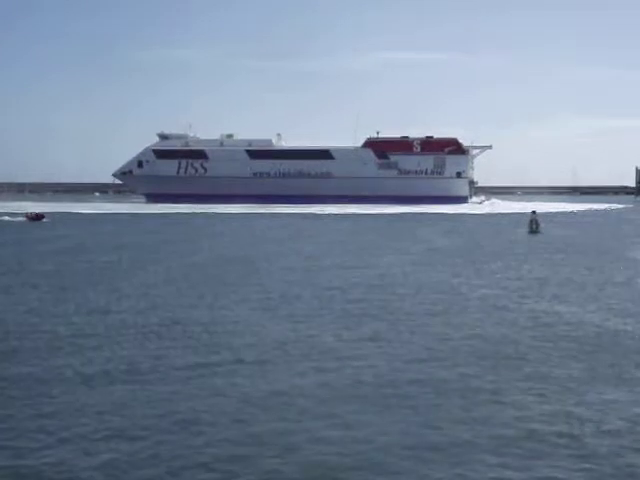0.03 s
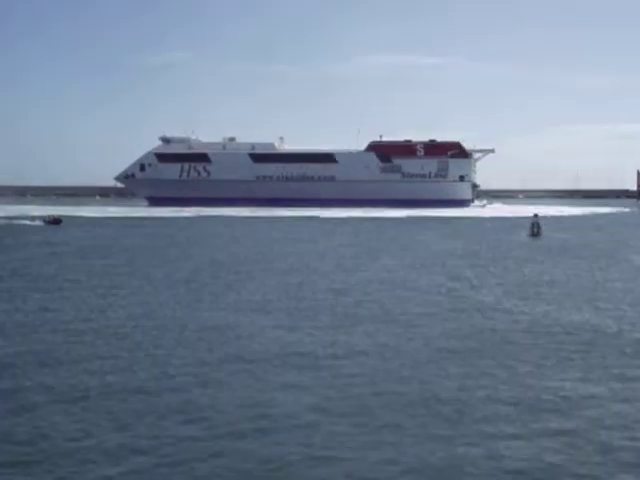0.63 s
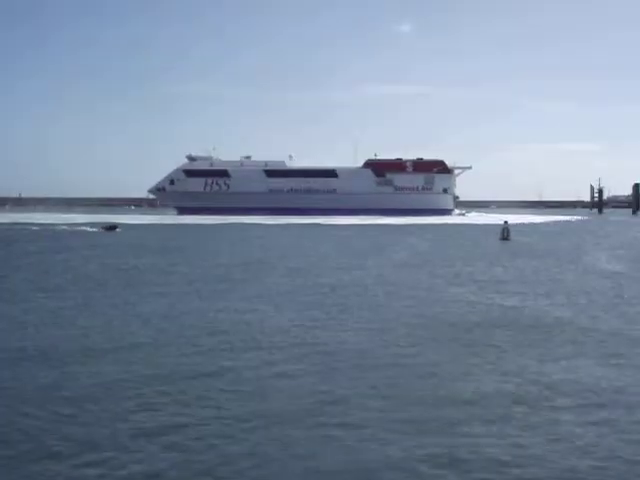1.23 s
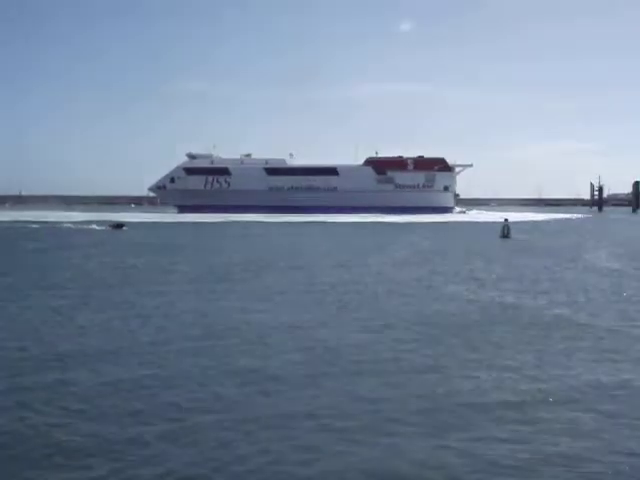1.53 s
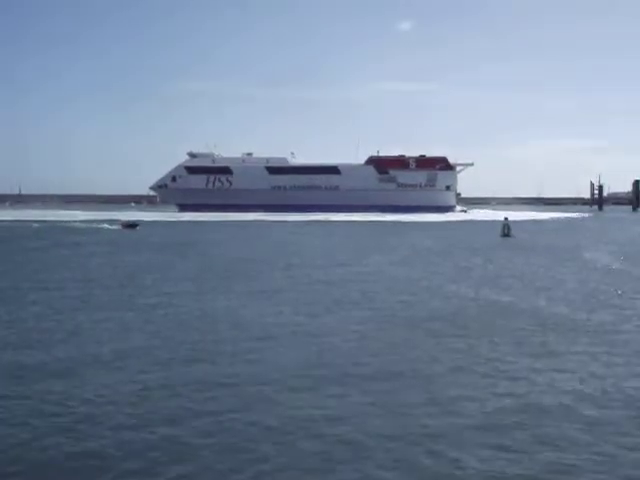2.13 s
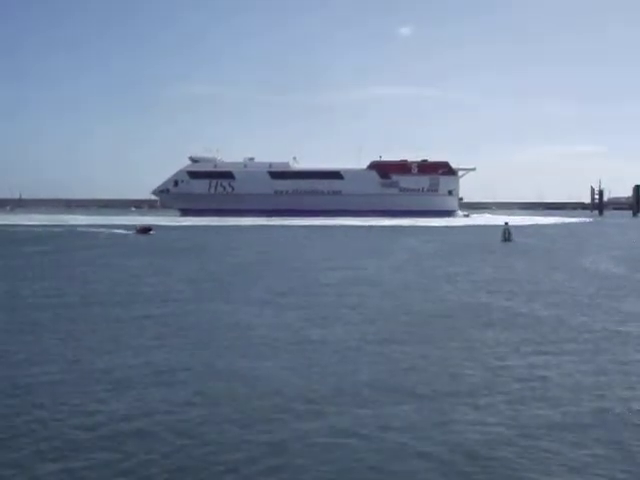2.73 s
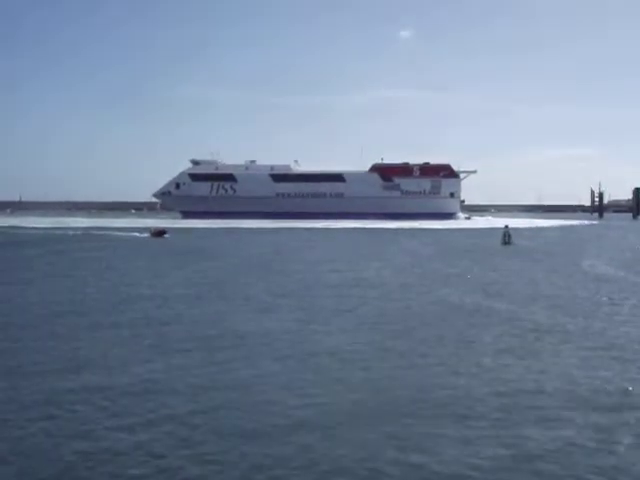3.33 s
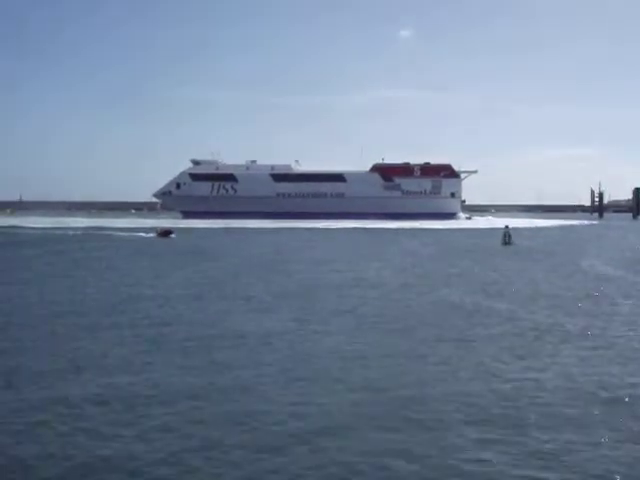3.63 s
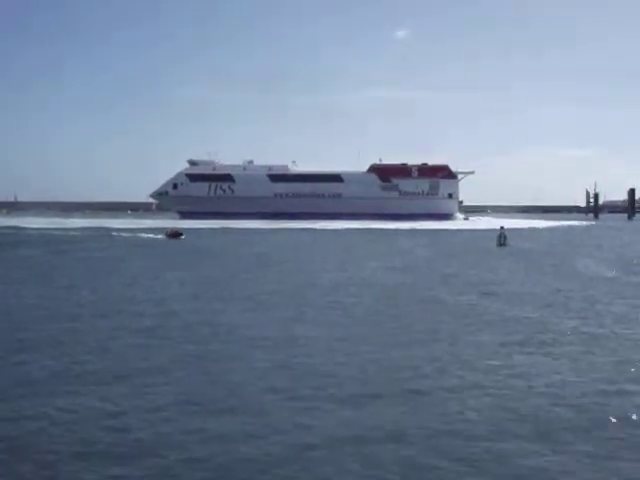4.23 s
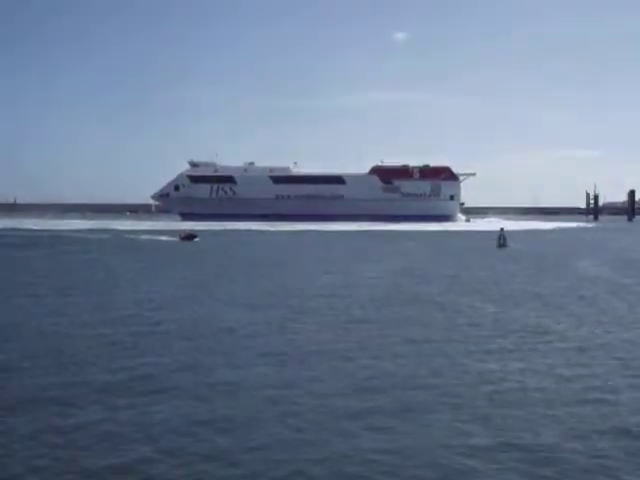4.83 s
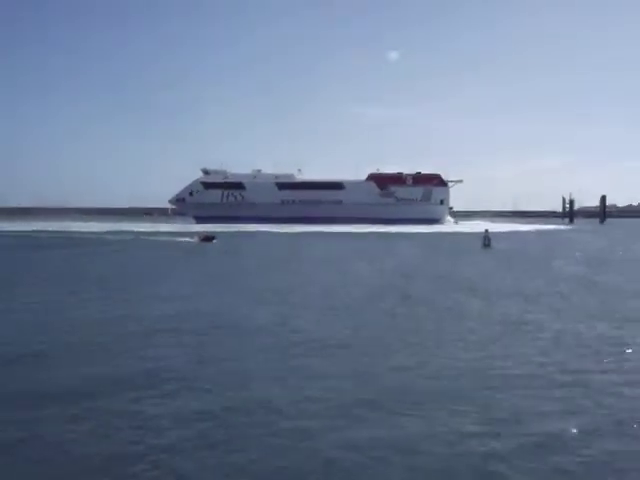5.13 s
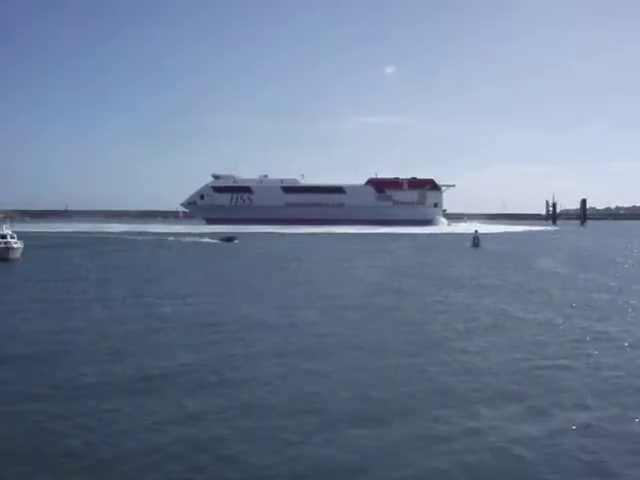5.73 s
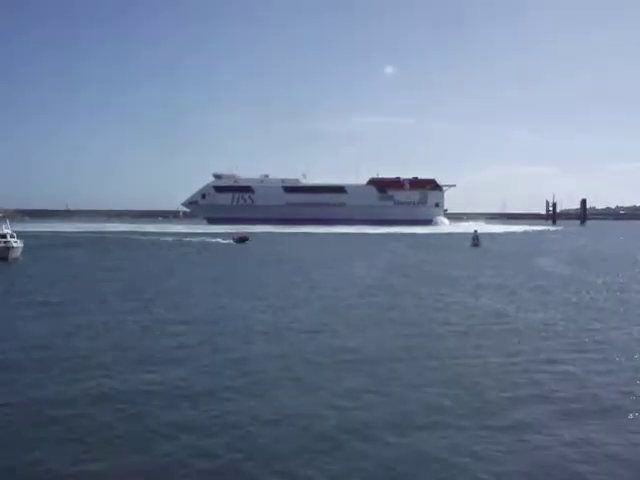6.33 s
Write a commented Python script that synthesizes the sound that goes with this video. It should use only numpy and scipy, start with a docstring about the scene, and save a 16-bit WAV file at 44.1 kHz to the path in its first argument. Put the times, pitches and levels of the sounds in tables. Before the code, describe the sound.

Wind gusts rumble on the microphone over a far ferry's low engines and churning water, with close clicks and brief lens motor whirs.

```python
"""A harbour, heard through a small camera's hissing microphone: far off, a big ferry's engines drone and
its wake washes. In the first second gusts buffet the microphone; right beside it the zoom lever clicks
and the lens motor whirs. Near 2 s a low hum swells and a faint machinery whine comes up, climbs, fades.
Around 5 s come more clicks and a second zoom, then breeze and ferry rise a little.
Throughout, the camera ducks briefly under loud peaks and clips them."""
import sys
import numpy as np
from scipy import signal
from scipy.fft import rfft, irfft
from scipy.io import wavfile
from scipy.ndimage import uniform_filter1d

SR = 44100
rng = np.random.default_rng(int(sys.argv[2]) if len(sys.argv) > 2 else 0)


def wrap_up_sound(samples):
    """Save the sound to the file named by the first command line argument, as 16-bit audio."""
    columns = np.atleast_2d(samples).T
    # keep every value between -1 and 1, then stretch to whole-number steps
    tamed = np.clip(columns, -1, 1)
    steps = np.round(tamed * 32767).astype(np.int16)
    wavfile.write(sys.argv[1], SR, steps)


N = 285327
T, HZ = np.arange(N) / SR, np.fft.rfftfreq(N, 1 / SR)

# Levels are relative within each table. Spectra of the camera's own noises: f/Hz, level/dB
HISS_SPECTRUM = [(500, -17.5), (2000, -9), (2450, -10.5), (2750, -1), (2980, 1.5), (3150, -4.5),
                 (3400, -14), (3700, -17), (4000, -22.5), (4500, -23.5), (5200, -28.5), (6000, -34.5)]
GEAR_SPECTRUM = [(1500, -25), (2380, -14.5), (2560, -8.5), (2720, 0.5), (2900, -2), (3080, -7),
                 (3350, -27.5), (3800, -25.5), (4200, -42.5), (5000, -38), (6000, -51)]
SCRAPE_SPECTRUM = [(600, -49), (1250, 3), (1800, 6), (2300, -3), (2850, 12.5), (3300, -22), (4200, -34.5),
                   (6000, -39)]
# stretches of lens motor whir: the first zoom, briefly dropping out near 0.95 s, then the second
# t/s, length/s, level/dB
WHIR_STRETCHES = [(0.718, 0.24, -21.5), (1.004, .07, -21.5), (4.886, .355, -21)]
# lever slides, next to the microphone: t/s, length/s, level/dB
LEVER_SLIDES = [(0.135, 0.028, -28), (0.706, 0.036, -19.5), (1.139, 0.044, -16.5), (4.863, 0.078, -18.5),
                (5.317, 0.036, -19)]
# lens actuator: t/s, length/s, level/dB, upper tone against lower/dB, roughness/rad
ACTUATOR_BUZZES = [(2.07, 0.03, -27, -16.5, 0.17), (5.904, 0.0078, -23, -8.5, 0.76)]
# zoom lever: t/s, level/dB, factor on the shell's pitch, brightness/(dB per octave)
LEVER_CLICKS = [(0.135, -9, 1.006, -4), (0.2396, -2, 0.97, 4), (0.4951, 7.5, 1.02, 8),
                (0.7233, -5.5, 1.1, 7), (1.0116, -13, 0.85, 7), (1.1526, -12, 1.03, 0),
                (1.1582, -6.5, 0.98, -3), (1.528, -13.5, 0.97, -16), (2.1615, -9, 1.02, 9),
                (3.9435, -12.5, 0.88, -4), (4.6323, 0, 0.95, -7), (4.6395, -8, .87, -1),
                (4.6873, -2, 1.01, -9), (4.6964, 0, 0.947, 2), (4.893, -7, 1, 4), (4.9069, -2, 0.98, 7),
                (5.292, 8, 1.13, -3), (5.294, 12, 0.74, -1), (5.3236, -7, 0.86, 14)]
# modes of the camera's shell: f/Hz, level/dB, t60/s
SHELL_MODES = [(1260, -22, 0.015), (1853, -8, 0.025), (2480, 2.5, 0.0082), (2807, -5, 0.014),
               (3970, -14.5, 0.0075)]

# spectra of wind on the microphone: f/Hz, level/dB
RUMBLE_SPECTRUM = [(4, -4.5), (12, -1.5), (28, 4.5), (50, -6.5), (70, -4.5), (100, -18.5), (160, -39),
                   (400, -64.5)]
FLUTTER_SPECTRUM = [(30, -30.5), (70, 1), (100, 1), (150, -4.5), (220, -11.5), (330, -21.5), (500, -28),
                    (1000, -45), (3000, -71)]
BUFFET_SPECTRUM = [(50, -17.5), (110, -1), (220, -3), (340, -15.5), (520, -26), (1000, -44), (3000, -60)]
# breeze between the gusts: t/s, level/dB
BREEZE_LEVELS = [(1.3, -22.5), (3, -33.5), (4.3, -27.5), (5.4, -27.5), (6.47, -19.5)]
# gusts and the sharp buffets inside them: t/s, length/s, level/dB
WIND_GUSTS = [(-.05, 0.34, -8), (0.457, 0.58, -9.5), (1.437, 0.48, -20.5), (2.423, 0.21, -22),
              (3.263, 0.31, -24), (3.727, 0.15, -21.5), (3.923, 0.32, -27.5), (6.03, 0.11, -17.5),
              (6.306, 0.089, -17.5)]
WIND_BUFFETS = [(0.015, 0.055, -13.5), (0.269, 0.019, -21), (0.55, 0.024, -13.5), (0.805, 0.06, -13.5),
                (0.932, .06, -16.5), (3.391, 0.019, -25)]
# single eddies that thump the microphone: t/s, level/dB, f/Hz
EDDY_THUMPS = [(0.132, -5.5, 86), (0.57, -7.5, 32), (0.675, -5, 86), (1.629, -4, 42), (3.303, -16, 45),
               (3.411, -15, 105), (4.091, -16, 35)]

# spectra of the ferry from across the water: f/Hz, level/dB
WAKE_SPECTRUM = [(300, -31.5), (700, -19), (1150, -5.5), (1350, -2.5), (1520, 3.5), (1680, 0.5),
                 (1830, 1.5), (2050, 2), (2400, -3.5), (3000, -2), (3600, -25.5), (4500, -37)]
HUM_SPECTRUM = [(130, -30.5), (160, -1), (178, 5.5), (198, 4.5), (225, -8), (260, -40)]
ROAR_SPECTRUM = [(25, -3), (80, 10), (140, -5.5), (230, -1.5), (300, -4), (430, -6.5), (650, -5),
                 (850, -3.5), (1150, -7), (1600, -12), (3000, -49.5)]
# the ferry as it crosses: t/s, roar level/dB, wake level/dB
FERRY_LEVELS = [(0, -30, -35), (1.4, -34, -36.5), (2.8, -31.5, -37), (4.1, -30, -33.5), (5.4, -30, -33.3),
                (6.47, -28, -30.5)]
# swells of the low hum: t/s, length/s, level/dB
HUM_SWELLS = [(1.794, 0.67, -39), (5.45, 0.17, -46)]
# steady engine tones: f/Hz, level/dB
ENGINE_TONES = [(46.5, -27.5), (175.5, -45), (258.5, -43.5), (856, -51)]
# exhaust and hull resonances: f/Hz, width/Hz, level over the roar/dB
HULL_RESONANCES = [(175, 21, 8), (186.4, 3.6, 11.5), (223.6, 21, 6.5), (253, 1.5, 8.5), (329, 29, 6.5),
                   (402, 10, 7), (477, 20, 1), (510.6, 60, 6), (640, 21, 5), (694, 31, 2), (787, 30, 3),
                   (848, 9.6, 3)]


def gain_of(db):
    return 10 ** (np.asarray(db) / 20)


def unit_power(x):
    return x / np.sqrt(np.mean(x ** 2) + 1e-20)


def shape(spectrum):
    """A spectrum table as a gain at every frequency."""
    hz, db = np.transpose(spectrum)
    return gain_of(np.interp(np.log(HZ + 1), np.log(hz), db))


def curve(rows, column=1):
    """One column of a timed table at every sample."""
    rows = np.array(rows)
    return np.interp(T, rows[:, 0], rows[:, column])


def noise(gain):
    """Noise of unit power with the given spectrum."""
    return unit_power(irfft(rfft(rng.standard_normal(N)) * gain, N))


def drift(hz):
    """Random wander up to about this rate."""
    return noise(1 / (1 + (HZ / hz) ** 4))


def steady_noise(spectrum, window_s=0.09):
    """Noise whose strength holds from one short stretch to the next."""
    x = noise(shape(spectrum))
    return x / np.sqrt(uniform_filter1d(x ** 2, int(window_s * SR)) + 0.1)


def envelope(start, length, rise_s, fall_s):
    """Attack, hold and an exponential release."""
    return np.clip((T - start) / rise_s, 0, 1) * np.exp(-np.maximum(T - start - length, 0) / fall_s)


def swells(rows, rise_s, fall_s):
    """One envelope a row, each at its level, summed."""
    return sum(gain_of(db) * envelope(start, length, rise_s, fall_s) for start, length, db in rows)


def lowpass(x, hz):
    return signal.oaconvolve(x, signal.firwin(161, hz, window=("kaiser", 9), fs=SR), "same")


def camera_hiss(level_db=-34.5):
    """The camera's self-noise lies under everything."""
    return gain_of(level_db) * noise(shape(HISS_SPECTRUM))


def lens_motor(rasp_db=1.3, sag_db_per_s=7.5):
    """Close by, the zoom gears run through a resonance of the shell, easing off as they go."""
    gears = steady_noise(GEAR_SPECTRUM, window_s=0.029) * gain_of(rasp_db * drift(60))
    out = np.zeros(N)
    for start, length, db in WHIR_STRETCHES:
        sag_db = sag_db_per_s * np.clip(T - start, 0, length)
        out += gears * envelope(start, length, rise_s=0.008, fall_s=0.002) * gain_of(db - sag_db)
    return out


def lens_actuator(tones_hz=(2246, 3690), trim_db=2, t60_s=0.15):
    """A small actuator in the lens buzzes on two rough tones."""
    out = np.zeros(N)
    for start, length, db, upper_db, roughness in ACTUATOR_BUZZES:
        lower, upper = (np.sin(2 * np.pi * hz * T + roughness * drift(170)) for hz in tones_hz)
        burst = envelope(start, length, rise_s=0.004, fall_s=t60_s / np.log(1000))
        out += gain_of(db + trim_db) * burst * (lower + gain_of(upper_db) * upper)
    return out


def lever_scrape(trim_db=-1, grain_db=2.8):
    """The zoom lever slides with a grainy scrape."""
    scrape = noise(shape(SCRAPE_SPECTRUM)) * unit_power(gain_of(grain_db * drift(250)))
    return scrape * sum(gain_of(db + trim_db) * np.sin(np.pi * np.clip((T - start) / length, 0, 1))
                        for start, length, db in LEVER_SLIDES)


def lever_clicks(trim_db=-3, rattle_s=0.0033, rise_s=0.0003, crack_s=0.00065,
                 knock_hz=850, knock_s=0.00097):
    """Right by the microphone, the lever cracks and knocks; its blow and tiny rattle ring the shell."""
    out, t = np.zeros(N), np.arange(2048) / SR
    # the shell carries only a middle band to the microphone
    shell_band = signal.butter(4, [900, 4000], "band", fs=SR, output="sos")
    knock = gain_of(-15) * np.sin(2 * np.pi * knock_hz * t) * np.exp(-t / knock_s)
    for start, db, pitch, brightness in LEVER_CLICKS:
        grit = rng.standard_normal(len(t))
        blow = (t == 0) + 0.11 * grit * np.exp(-t / rattle_s)
        modes = np.zeros(len(t))
        for hz, mode_db, t60 in SHELL_MODES:
            tilt_db = brightness * np.log2(min(hz, 3300) / 2480)  # a sharper blow favours high modes
            modes += gain_of(mode_db + tilt_db - 60 * t / t60) * np.sin(2 * np.pi * hz * pitch * t)
        modes *= 1 - np.exp(-t / rise_s)
        ring = signal.sosfilt(shell_band, signal.fftconvolve(blow, modes)[:len(t)])
        crack = gain_of(-19) * grit * (t / crack_s) * np.exp(1 - t / crack_s)
        first = round(start * SR)
        out[first:first + len(t)] += gain_of(db + trim_db) * (ring + crack + knock)
    return out


def microphone_wind(flutter_db=-7, flutter_growth=1.31, flicker_db=3):
    """Gusts ride a breeze onto the microphone: rumble, faster-growing flutter, buffets, eddy thumps."""
    gusts = swells(WIND_GUSTS, rise_s=0.014, fall_s=0.05)
    force = np.hypot(gain_of(curve(BREEZE_LEVELS)), gusts)
    rumble = steady_noise(RUMBLE_SPECTRUM) * force
    flutter = steady_noise(FLUTTER_SPECTRUM) * force ** flutter_growth
    flutter *= gain_of(flutter_db + flicker_db * np.tanh(drift(13)))
    buffets = steady_noise(BUFFET_SPECTRUM, window_s=0.058)
    buffets *= swells(WIND_BUFFETS, rise_s=0.014, fall_s=0.0027)
    thumps = np.zeros(N)
    for centre, db, hz in EDDY_THUMPS:
        turns = (T - centre) * hz
        thumps += gain_of(db) * np.exp(-2 * turns ** 2) * np.cos(2 * np.pi * turns)
    return rumble + flutter + buffets + thumps


def machinery_whine(start_s=1.8, from_hz=464, to_hz=523.4, climb_s=2.4, upper_ratio=1.9, level_db=-39.5):
    """Two far shaft tones climb towards a steady pitch; moving air makes them waver and fade."""
    pitch = to_hz + (from_hz - to_hz) * np.exp(-np.maximum(T - start_s, 0) / climb_s)
    phase = 2 * np.pi * np.cumsum(pitch * (1 + 0.01314 * drift(14))) / SR
    shafts = np.sin(phase) + gain_of(-6) * np.sin(upper_ratio * phase)
    fading = gain_of(level_db + 3 * drift(4.1))
    return shafts * fading * envelope(start_s, length=0.95, rise_s=0.11, fall_s=1)


def ferry_wake(churn_db=1.43):
    """Water churns behind the distant ferry."""
    return noise(shape(WAKE_SPECTRUM)) * gain_of(curve(FERRY_LEVELS, column=2) + churn_db * drift(15))


def ferry_engines(roar_trim_db=1, hum_db=-43, wander_turns=0.05):
    """From across the harbour: a roar ringing in exhaust and hull, a swelling hum and engine tones."""
    resonance_power = 1 + sum(gain_of(db) ** 2 / (1 + (2 * (HZ - hz) / width) ** 2) ** 2
                              for hz, width, db in HULL_RESONANCES)
    roar = noise(shape(ROAR_SPECTRUM) * np.sqrt(resonance_power))
    roar *= gain_of(curve(FERRY_LEVELS) + roar_trim_db)
    hum = noise(shape(HUM_SPECTRUM)) * (gain_of(hum_db) + swells(HUM_SWELLS, rise_s=0.18, fall_s=0.15))
    # moving air over the water makes the far tones waver
    tones = sum(gain_of(db) * np.sin(2 * np.pi * (hz * T + wander_turns * drift(6.6)))
                for hz, db in ENGINE_TONES)
    return roar + hum + tones


def scene():
    """One microphone: the camera at no distance, the wind on it, the ferry far out."""
    camera = camera_hiss() + lens_motor() + lens_actuator() + lever_scrape() + lever_clicks()
    return (camera + microphone_wind() + machinery_whine() + ferry_wake() + ferry_engines())[None]


def record(dry, band_hz=5650, knee_db=-7, recover_db_per_s=430, attack_s=0.0016, squeeze=1.9,
           ceiling=0.74, hardness=12, edge_hz=15900):
    """In the camera: a narrow band, a quick limiter that lets the first peaks clip, a last low-pass."""
    x = lowpass(dry[0], band_hz)
    pole = np.exp(-1 / (attack_s * SR))
    smoother = [1 - pole], [1, -pole]
    power_db = 10 * np.log10(signal.lfilter(*smoother, x ** 2) + 1e-12)
    recovery_db = T * recover_db_per_s
    held_db = np.maximum.accumulate(power_db + recovery_db) - recovery_db
    over_db = np.maximum(held_db - knee_db, 0)
    x = x / gain_of(squeeze * signal.lfilter(*smoother, over_db))
    # the amplifier rounds off whatever reaches its ceiling
    x = x / (1 + abs(x / ceiling) ** hardness) ** (1 / hardness)
    return lowpass(x, edge_hz)[None]


dry = scene()
out = record(dry)
wrap_up_sound(out)
```